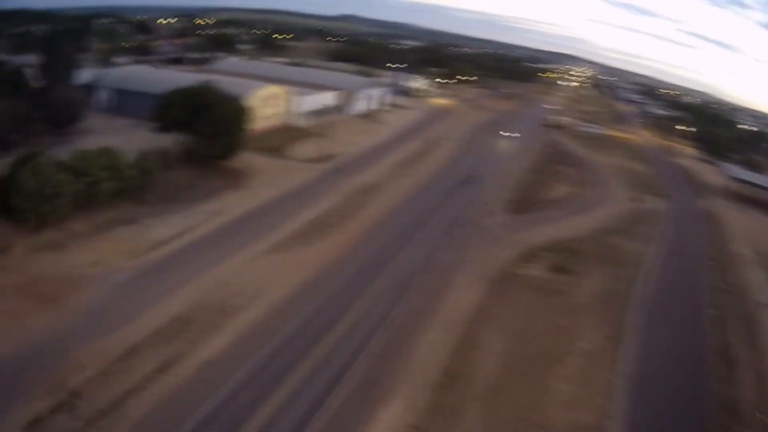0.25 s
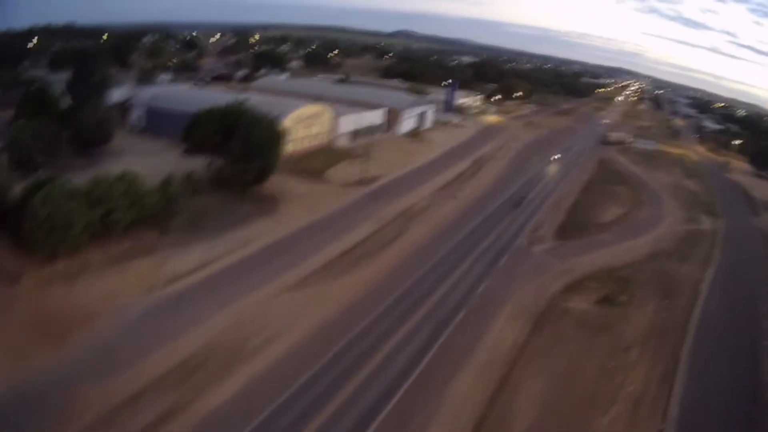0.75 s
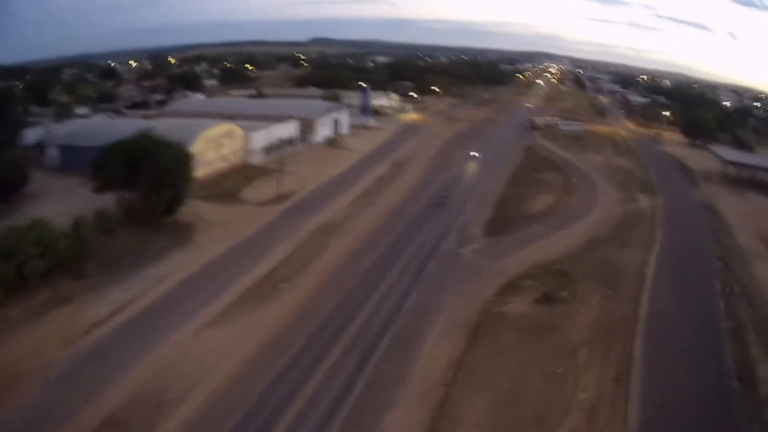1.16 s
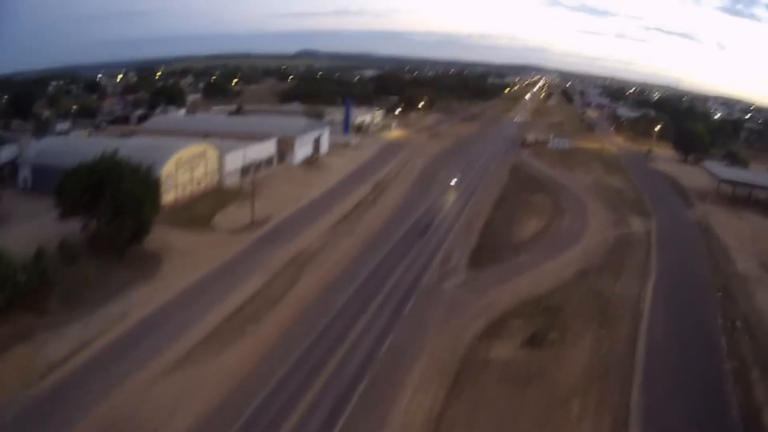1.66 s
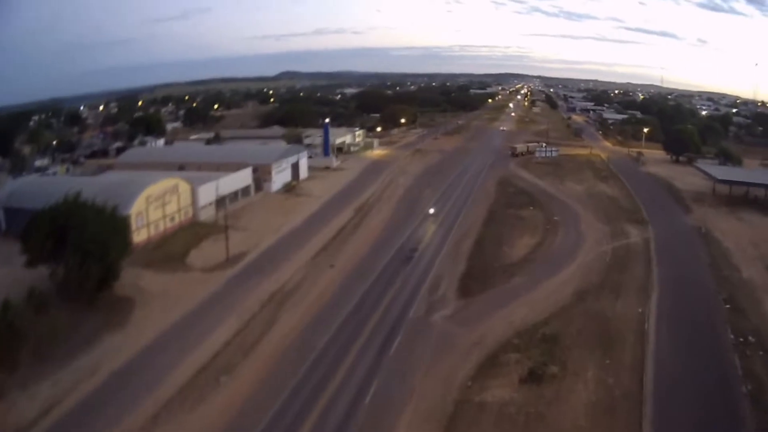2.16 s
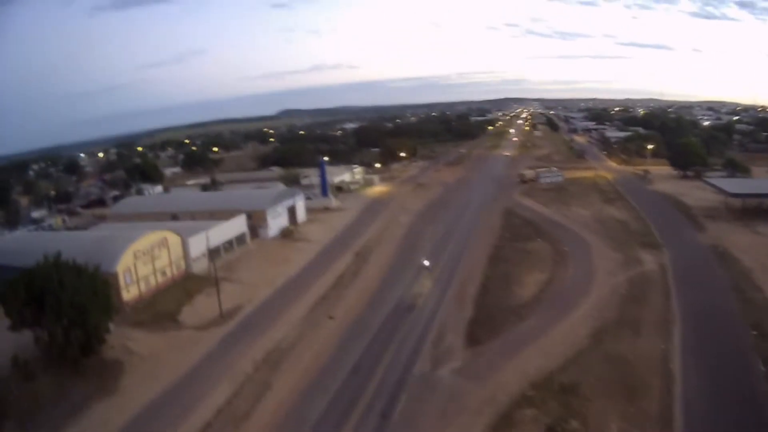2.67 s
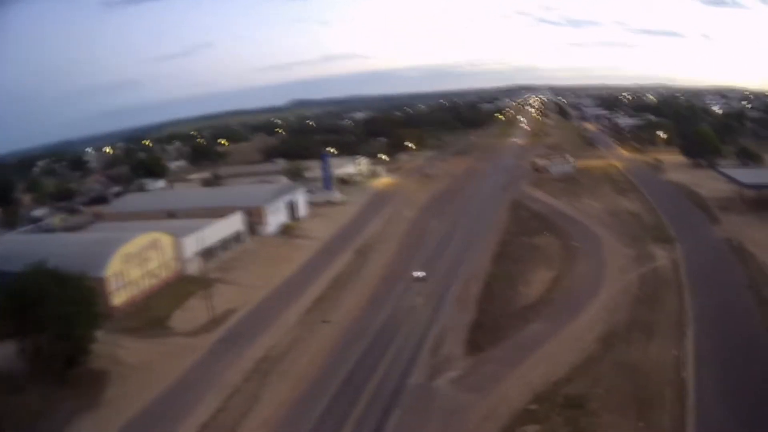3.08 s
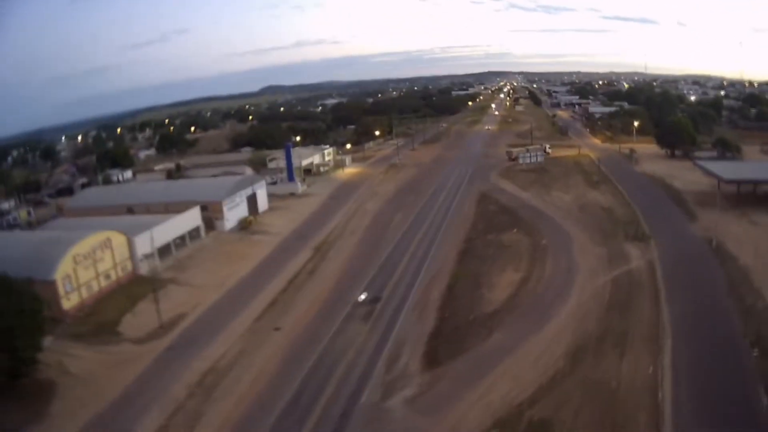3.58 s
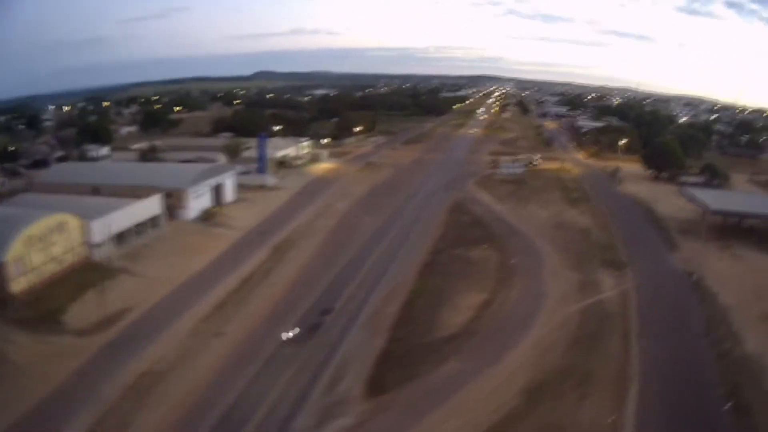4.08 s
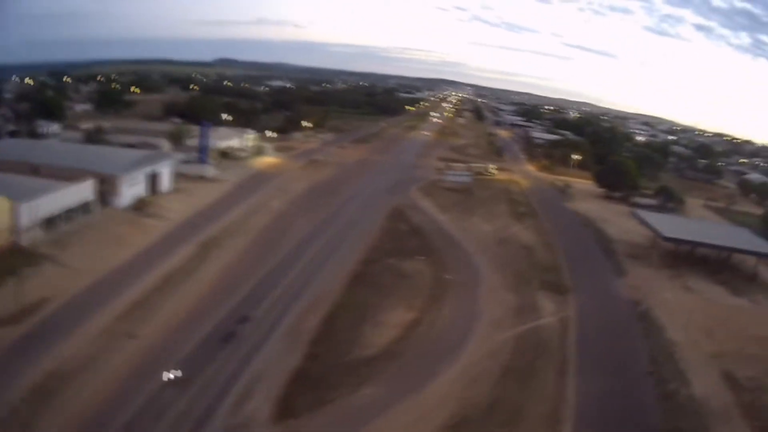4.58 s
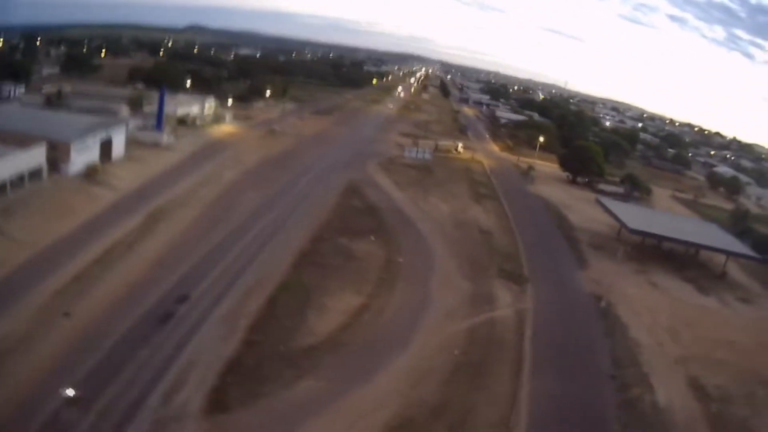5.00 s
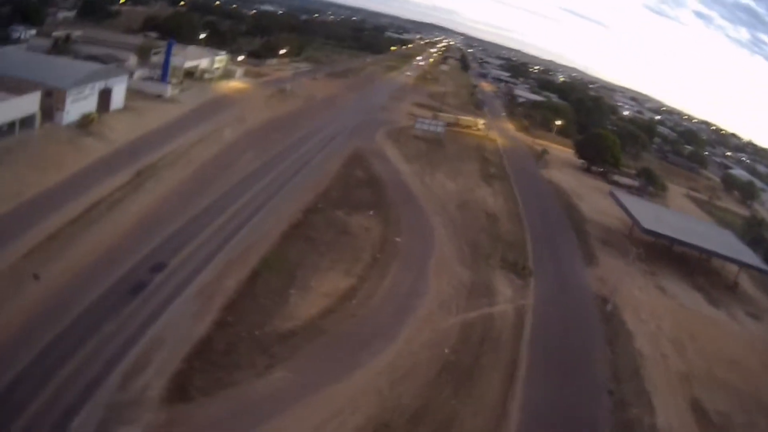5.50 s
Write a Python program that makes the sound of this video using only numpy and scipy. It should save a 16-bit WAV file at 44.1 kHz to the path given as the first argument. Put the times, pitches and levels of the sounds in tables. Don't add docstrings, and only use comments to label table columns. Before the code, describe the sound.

Constant buzzing aircraft engine drone with fluttering propeller chop and rough wind roar, distorted, thin in the bass and dull on top.

```python
import sys
import numpy as np
from scipy import signal
from scipy.fft import rfft, irfft, next_fast_len
from scipy.io import wavfile
from scipy.ndimage import uniform_filter1d, map_coordinates

SR = 44100
rng = np.random.default_rng(int(sys.argv[2]) if len(sys.argv) > 2 else 0)


def decibels_to_gain(level_db):
    exponent = np.asarray(level_db, float) / 20
    return 10 ** exponent


def output_pcm(signal):
    pcm = np.clip(np.atleast_2d(signal).T, -1, 1) * 32767
    wavfile.write(sys.argv[1], SR, np.round(pcm).astype(np.int16))


N = 253134

# time in seconds, firings per second in Hz.
SPEED = [(0.0, 113.01), (0.6, 116.93), (0.9, 118.18), (1.05, 118.19), (1.2, 117.49), (1.95, 109.39),
         (2.1, 108.72), (2.25, 109.34), (2.55, 111.96), (2.7, 112.63), (3.15, 113.41), (3.9, 113.65),
         (4.35, 114.91), (4.5, 114.94), (4.95, 113.43), (5.25, 112.94), (5.55, 112.94), (5.74, 112.67)]


def unit(x):
    return x / np.sqrt(np.mean(x ** 2) + 1e-20)


def along(points, hz):
    f, v = np.transpose(points)
    return np.interp(np.log(hz + 1), np.log(f + 1), v)


def firing_rate():
    seconds, hz = np.transpose(SPEED)
    return np.interp(np.arange(N) / SR, seconds, hz)


def wobble(rate):
    points = rng.standard_normal(int(N * rate / SR) + 4)
    coarse = map_coordinates(points, [np.arange(0, N + 64, 64) * rate / SR])
    return np.interp(np.arange(N), np.arange(len(coarse)) * 64, coarse)


def filtered(x, gain):
    m = next_fast_len(N + 8192)
    return irfft(rfft(x, m) * gain(np.fft.rfftfreq(m, 1 / SR)), m)[:N]


def swells(movers, answers):
    cruise_hz, turn_at_s, turn_length_s = 113.5, 2.5, 0.25
    swing_period_s, second_bump = 3.22, 0.6
    t = np.arange(N) / SR
    faster = firing_rate() - cruise_hz
    turned = np.tanh((t - turn_at_s) / turn_length_s) / 2
    change = {}
    for k, (db_per_hz, turn_db, swing_db, peak_s) in zip(movers, answers):
        angle = 2 * np.pi * (t - peak_s) / swing_period_s
        swing = np.cos(angle) + second_bump * np.cos(2 * angle)
        change[k] = db_per_hz * faster + turn_db * turned + swing_db * swing
    return change


def note(turns, orders, swell_db, phase, drift_db, waver):
    out = np.zeros(N)
    for count, (_, db) in enumerate(orders, start=1):
        loose = 0.3 if count in swell_db else min(count / 12, 1) ** 2
        angle = 2 * np.pi * count * turns + phase(count) + waver * count * wobble(6)
        level_db = db + swell_db.get(count, 0) + drift_db * loose * wobble(3.01)
        out += np.sqrt(2) * decibels_to_gain(level_db) * np.cos(angle)
    return out


def clatter(crank):
    # frequency in Hz, level in dB per Hz.
    clatter_color = [(1000, -22.5), (2500, -0.5), (5000, 2.5), (10000, -7.5), (20000, -22)]
    gate = np.exp(3 * (np.cos(2 * np.pi * (crank - 0.04)) - 1))
    knocks = gate * decibels_to_gain(2 * wobble(60)) * rng.standard_normal(N)
    return decibels_to_gain(-25.5) * unit(filtered(knocks, lambda f: decibels_to_gain(along(clatter_color, f))))


def rasp(crank, blade):
    beat = np.cos(2 * np.pi * (blade + 0.13))
    beat = beat + np.cos(2 * np.pi * (crank + 0.38)) + np.cos(4 * np.pi * (crank + 0.14))
    bursts = np.exp(0.55 * beat) * rng.standard_normal(N)
    center_hz, half_width_hz = 1360, 260
    ring = lambda f: 1 / (1 + ((f - center_hz) / half_width_hz) ** 2)
    return decibels_to_gain(-13) * unit(filtered(bursts, ring))


def roar(crank, blade):
    # frequency in Hz, level in dB per Hz.
    air_color = [(8, -1), (30, 1), (100, -0.5), (250, 1), (500, 0.5), (900, 0), (1700, -10), (2300, -8.5),
                 (2900, -23.5), (4000, -12), (8000, -31), (20000, -63.5)]
    # frequency in Hz, width in Hz, lift in dB.
    housing = [
        (1355, 460, 1),
        (2034, 110, 2),
        (3020, 360, -34),
    ]

    cells = signal.stft(rng.standard_normal(N + 512), nperseg=512)[2]
    patches = uniform_filter1d(rng.standard_normal(cells.shape), size=5, axis=0)
    patches = uniform_filter1d(patches, size=8, axis=1)
    air = signal.istft(cells * decibels_to_gain(0.65 * unit(patches)), nperseg=512)[1][:N]

    engine_puff = 0.22 * np.cos(4 * np.pi * (crank - 0.33))
    blade_puff = 0.25 * np.cos(4 * np.pi * (blade - 0.46))
    air = air * np.exp(engine_puff - blade_puff)
    air = air * decibels_to_gain(0.43 * wobble(120) + 0.37 * wobble(5.2))

    def color(f):
        lift = 1 + sum(decibels_to_gain(db) / (1 + ((f - c) / (w / 2)) ** 2) for c, w, db in housing)
        return decibels_to_gain(along(air_color, f)) * lift

    return decibels_to_gain(-5.5) * unit(filtered(air, color))


def propeller(blade):
    # multiple of the blade rate, level in dB rms.
    blade_lines = [(1, -18), (2, -22), (3, -14), (4, -12.5), (5, -12), (6, -12), (7, -24), (8, -19.5),
                   (9, -14), (10, -21), (11, -22.5), (12, -22.5), (13, -26), (14, -23), (15, -22),
                   (16, -19.5), (17, -21.5), (18, -25.5), (19, -30.5), (20, -31.5), (21, -31.5),
                   (22, -30.5), (23, -31), (24, -32.5)]
    blade_movers = (3, 4, 5, 6, 9, 14)
    # dB per Hz of speed, change in dB through the turn,
    # swing depth in dB, swing peak in seconds.
    blade_answers = [(-0.52, -2.5, 1.25, 2.6), (-0.69, -1.5, 4.5, 0.74), (0.17, 1, 1.5, 0.21),
                     (.2, 1.5, -0.4, 0.55), (-0.0095, -1.2, -2.5, 0.34), (0.87, 10.5, -5, 0.27)]

    def sweep(k):
        scatter = (k < 3 or k > 7) * rng.normal(0, 2)
        return -0.12 * np.pi * (k - 1.7) ** 2 + scatter

    swell_db = swells(blade_movers, blade_answers)
    return note(blade, blade_lines, swell_db, sweep, drift_db=4.0, waver=0.0099)


def exhaust(crank, blade):
    # multiple of the firing rate, level in dB rms.
    exhaust_lines = [(1, -19.5), (2, -36.5), (3, -24.5), (4, -24.5), (5, -28), (6, -14.5), (7, -13.5),
                     (8, -9.5), (9, -40), (10, -24.5), (11, -37), (12, -22), (13, -23.5), (14, -25.5),
                     (15, -29), (16, -24.5), (17, -34.5), (18, -34.5), (19, -25), (20, -23.5), (21, -25),
                     (22, -40), (23, -41), (24, -35.5), (25, -42.5), (26, -51.5), (27, -40), (28, -50),
                     (29, -46.5), (30, -52)]
    exhaust_movers = (6, 7, 8, 10, 12, 14, 20)
    # dB per Hz of speed, change in dB through the turn,
    # swing depth in dB, swing peak in seconds.
    exhaust_answers = [(0.47, 0.2, 0.9, .1), (0.05, 2.5, 0, .15), (0.34, 0.2, 0.5, .05),
                       (-3.2, 0.3, 1.5, 2.9), (-1.2, 3, 0.5, 1.9), (-0.2, 4, 3.3, .3), (-0.1, 5.5, 0.7, .2)]

    def scatter(k):
        aligned = k in (6, 7, 8, 10, 20, 21, 22)
        return rng.normal(0, 1) * (0.1 if aligned else 1.5)

    swell_db = swells(exhaust_movers, exhaust_answers)
    pulses = note(crank, exhaust_lines, swell_db, scatter, drift_db=1.5, waver=0.027)
    return pulses * (1 + 0.21 * np.cos(2 * np.pi * blade))


def scene():
    crank = np.cumsum(firing_rate()) / SR
    blade = crank * 0.7044
    air = clatter(crank) + rasp(crank, blade) + roar(crank, blade)
    return (air + propeller(blade) + exhaust(crank, blade))[None]


def hiss(driven):
    # frequency in Hz, level in dB per Hz.
    hiss_color = [(2500, -15), (4000, -3.5), (5500, -12.5), (7000, -29), (8000, -37.5), (10000, -32),
                  (12500, -43), (15500, -47.5), (20000, -58)]
    swing = uniform_filter1d(np.abs(np.gradient(np.gradient(driven))), size=60)
    noise = unit(swing) ** 0.37 * rng.standard_normal(N)
    return decibels_to_gain(-49) * unit(filtered(noise, lambda f: decibels_to_gain(along(hiss_color, f))))


def microphone(driven):
    # frequency in Hz, gain in dB.
    port = [(2100, 0), (2500, -2), (3000, -2), (3400, -9.5), (4000, -20.5), (5000, -28), (6000, -33),
            (7000, -40.5), (8000, -56.5), (9000, -47.5), (10500, -45.5), (12500, -56.5), (15000, -63.5),
            (20000, -60)]
    give = 0.11
    squared = 0.9 * (driven / (1 + np.abs(driven) ** 3) ** (1 / 3) + give * driven)

    def response(f):
        bass_cut = (150 + 1j * f) / (5000 + 1j * f)
        peak_hz, width_hz = 1380, 350
        ring = 1j * f * width_hz
        presence = 1 + decibels_to_gain(-8) * ring / (peak_hz ** 2 - f * f + ring)
        return bass_cut * presence * decibels_to_gain(along(port, f))

    return filtered(squared, response)


def low_pass(x):
    return signal.sosfilt(signal.butter(12, 15460, fs=SR, output="sos"), x)


def record(dry):
    driven = 2.1 * unit(dry[0])
    heard = microphone(driven) + hiss(driven)
    from_edge = np.minimum(np.arange(N), np.arange(N)[::-1])
    mix = heard * np.clip(from_edge / 40, 0.3, 1)
    return low_pass(mix[None])


dry = scene()
out = record(dry)
output_pcm(out)
```